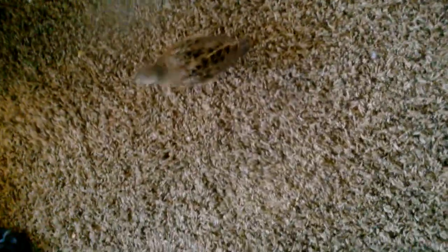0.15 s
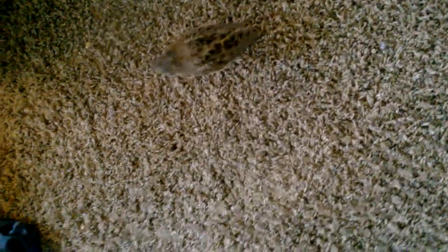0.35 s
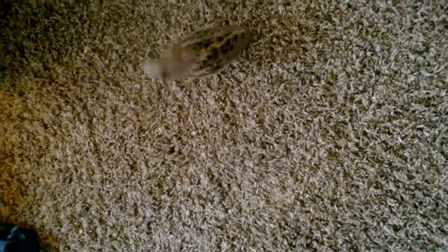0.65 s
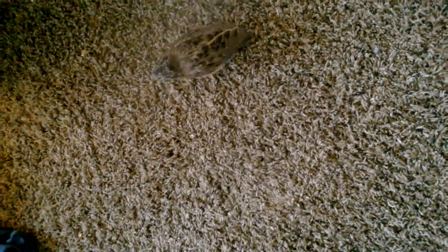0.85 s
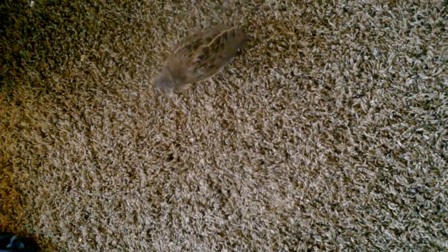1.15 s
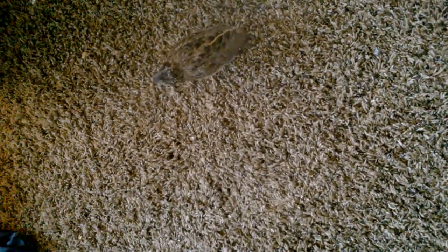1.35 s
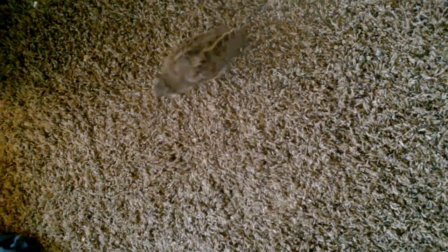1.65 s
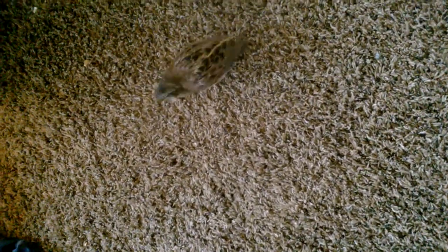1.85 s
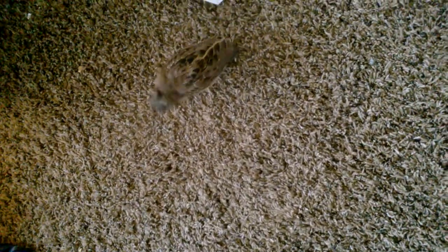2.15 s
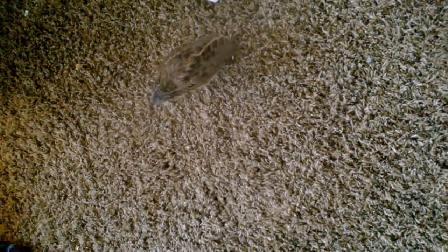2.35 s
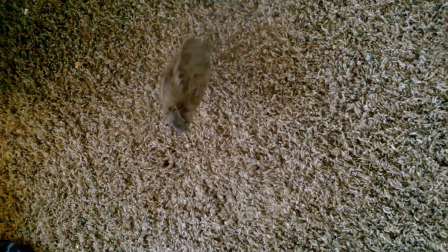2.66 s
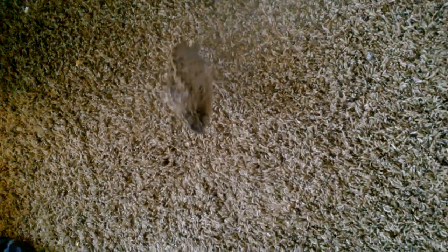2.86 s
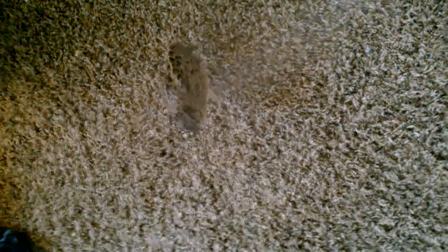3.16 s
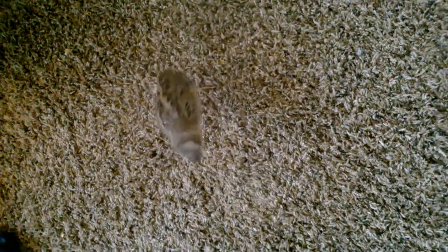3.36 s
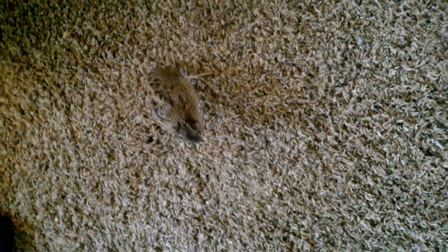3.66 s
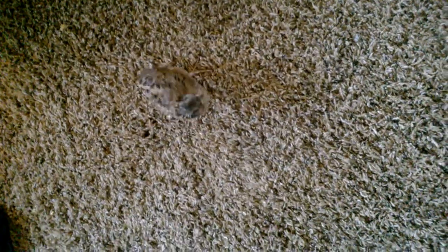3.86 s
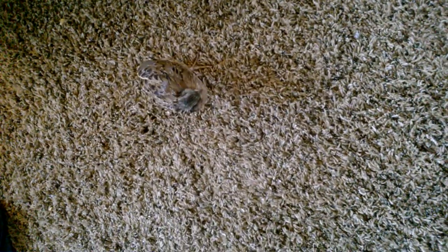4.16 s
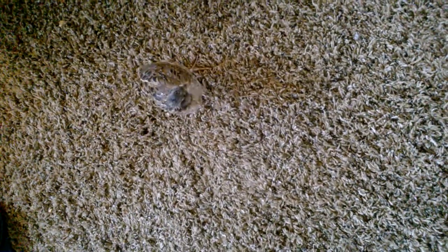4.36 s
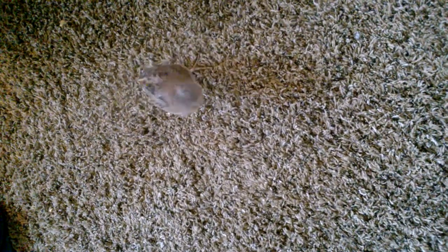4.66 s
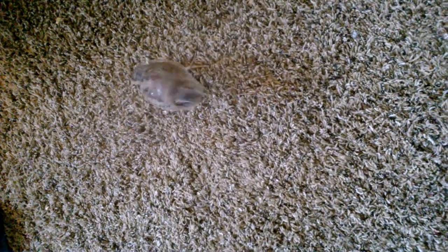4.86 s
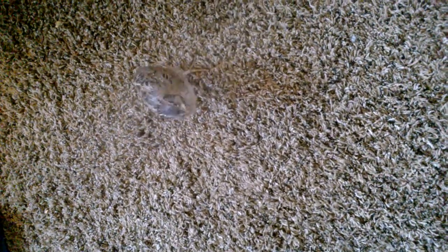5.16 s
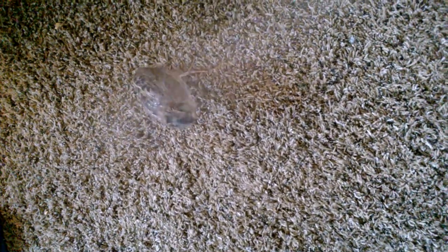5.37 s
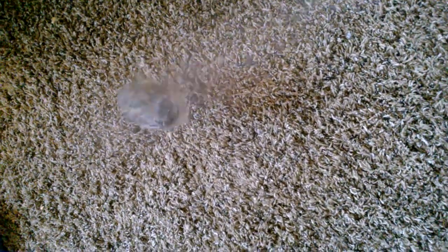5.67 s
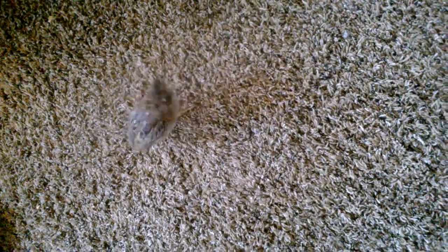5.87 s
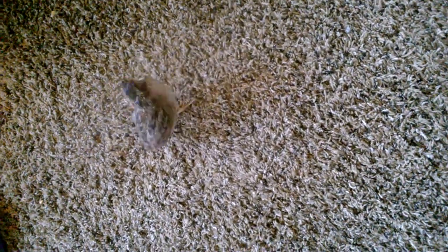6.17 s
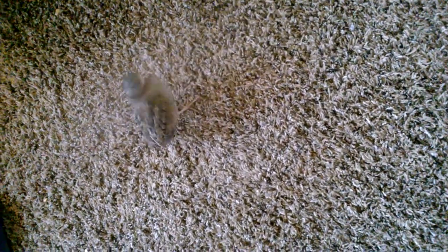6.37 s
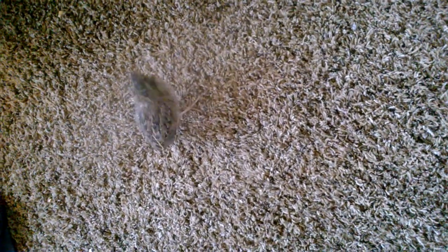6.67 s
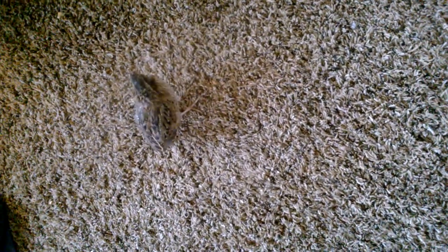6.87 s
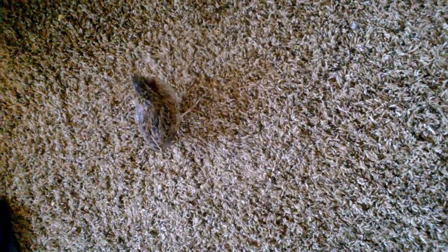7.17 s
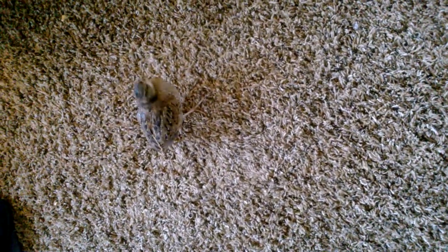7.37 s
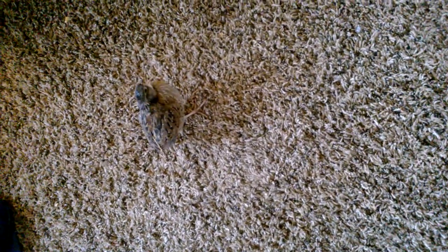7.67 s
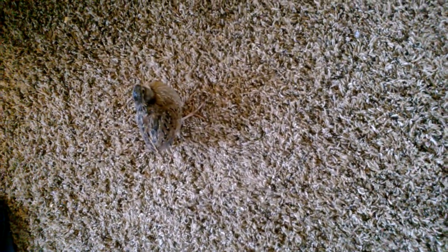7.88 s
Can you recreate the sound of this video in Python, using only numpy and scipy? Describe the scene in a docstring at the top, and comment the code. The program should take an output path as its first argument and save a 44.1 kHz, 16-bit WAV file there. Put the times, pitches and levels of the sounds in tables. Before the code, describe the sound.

Close handheld pickup of a small bird rubbing its wings and plumage on carpet indoors. Regular scratchy swishes with clicking quills and rustling feathers grow firmer, stop briefly, then return louder. The bout ends in a few sharp, fading ticks. Afterwards only low fan noise remains, with one soft rising peep and a fainter, nearly level one. Dull handling thuds occur early on, and the room adds only a short, soft echo.

```python
"""Quail dust-bathing on carpet

Two bouts of about three wing shuffles a second in a quiet room, mostly harder as they go on.
Each shuffle: a quill catches, a quickening run of ticks (noise snaps, ringing knocks), a low puff (sine glide),
a swish (shaped noise), a thin squeak (gliding partials) and a soft tap; loose plumage rustles and crackles.
A fan hums behind (noise, tones), the hand-held camera is bumped (dull noise thuds), two faint peeps come late.
"""
import sys
import numpy as np
from scipy import signal
from scipy.fft import rfft, irfft, next_fast_len
from scipy.io import wavfile
from scipy.ndimage import uniform_filter1d, map_coordinates

SR = 44100
rng = np.random.default_rng(int(sys.argv[2]) if len(sys.argv) > 2 else 0)


def master_out(mix):
    """Clip the mix to full scale and print it as 16-bit PCM to the path in sys.argv[1]."""
    frames = np.transpose(np.atleast_2d(mix))
    ceiling = np.clip(frames, -1, 1)
    pcm = np.round(ceiling * 32767).astype(np.int16)
    wavfile.write(sys.argv[1], SR, pcm)


N = 353525


def amp(db):
    """Decibels to gain."""
    return 10 ** (np.asarray(db) / 20)


def unit(x):
    """Scale to rms 1."""
    return x / np.sqrt(np.mean(x ** 2) + 1e-20)


def brief(x):
    """Scale a click to the energy of 5 ms at rms 1."""
    return x / np.linalg.norm(x) * np.sqrt(.005 * SR)


def clock(count):
    """Sample times in seconds."""
    return np.arange(count) / SR


def along(points, hz):
    """Read (hz, value) points on a log-frequency axis."""
    f, v = np.transpose(points)
    return np.interp(np.log(hz + 1), np.log(f + 1), v)


def filtered(x, response):
    """x times a response of frequency."""
    m = next_fast_len(N + SR // 4)
    return irfft(rfft(x, m) * response(np.fft.rfftfreq(m, 1 / SR)), m)[:N]


def wobble(rate_hz, count):
    """Smooth random curve, rate_hz knots a second."""
    knots = rng.standard_normal(int(count * rate_hz / SR) + 4)
    return map_coordinates(knots, [clock(count) * rate_hz])


def noise(spectrum, grain_db=0, patchy_db=0):
    """Coloured noise of rms 1; grain_db clumps it into tiny slips, patchy_db lets its colour drift."""
    slips = rng.standard_normal(N) * amp(grain_db * wobble(1500, N))
    z = signal.stft(slips, nperseg=512)[2]
    field = uniform_filter1d(rng.standard_normal(z.shape), size=9, axis=0)
    field = uniform_filter1d(field, size=9, axis=1)
    slips = signal.istft(z * amp(patchy_db * unit(field)), nperseg=512)[1][:N]
    return unit(filtered(slips, lambda hz: amp(along(spectrum, hz))))


def impulse(spectrum, size=512):
    """Causal impulse response of a spectrum, by folding its cepstrum."""
    cepstrum = irfft(np.log(amp(along(spectrum, np.fft.rfftfreq(size, 1 / SR)))))
    cepstrum[1:size // 2] *= 2
    cepstrum[size // 2 + 1:] = 0
    return irfft(np.exp(rfft(cepstrum)))


def add(track, start_s, sound):
    """Mix a sound into a track."""
    part = track[max(round(start_s * SR), 0):][:len(sound)]
    part += sound[:len(part)]


def stroke(t, start_s, end_s, rise_s, fall_s):
    """Rubbing speed: swells at the start, ebbs at the end."""
    return (1 + np.tanh((t - start_s) / rise_s)) * (1 - np.tanh((t - end_s) / fall_s)) / 4


def follow(law, excess_db):
    """Layer level when the bird works excess_db harder than usual; law = (usual_db, db_per_db)."""
    usual_db, slope = law
    return usual_db + slope * excess_db


# fan rumble spectrum: freq_hz, density_db
FAN_RUMBLE = [(20, -1), (45, -1.5), (105, -3), (135, -12.5), (280, -15), (550, -17.5), (800, -46)]
# duct noise spectrum: freq_hz, density_db
DUCT_AIR = [(400, -37), (600, -14), (680, -7.5), (800, 2.5), (930, 4), (1080, -11), (1400, -13.5),
            (2000, -17), (2800, -23), (5500, -24), (7000, -29), (16000, -30.5)]
# fan tones: freq_hz, rms_db
FAN_TONES = [(70, -78), (97, -72.5), (662, -76.5)]


def fan():
    """A distant fan: low rumble, a band of duct noise and weak wavering tones."""
    t, hum = clock(N), np.zeros(N)
    for hz, db in FAN_TONES:
        hum += amp(db) * np.sqrt(2) * np.sin(2 * np.pi * hz * t + 0.35 * wobble(9.1, N))
    rumble = amp(-67 + 2.2 * wobble(3.87, N)) * noise(FAN_RUMBLE)
    air = amp(-65.0 + 0.71 * wobble(7, N)) * noise(DUCT_AIR)
    return hum + rumble + air


# bumps of the hand on the camera: start_s, level_db
BUMPS = [(0.001, -47.5), (0.149, -49.5), (0.76, -43)]


def bumps(t60_s=0.17):
    """The camera body answers the hand with dull, short thuds."""
    t, level = clock(SR // 4), np.zeros(N)
    for start_s, db in BUMPS:
        add(level, start_s, amp(db - 60 * t / t60_s) * (1 - np.exp(-t / 0.00057)))
    body = [(30, -1), (100, -5), (270, 2.5), (480, -6.0), (1000, -9.5), (2000, -18), (5000, -60)]
    return level * noise(body)


# wing shuffles, also played by the layers below: run_start_s, catch_lead_s, first_gap_s, swish_length_s,
# tap_delay_s (from run start), pressure_db (on the pile), swish_db (drive)
SHUFFLES = [(0.169, 0.017, 0.012, 0.094, .2008, -55.5, -45.5),
            (0.481, 0.032, .012, 0.084, .2021, -60.5, -45), (0.789, 0.036, 0.017, 0.099, .205, -47, -45.5),
            (1.081, .022, .015, 0.087, 0.21, -46.5, -43.5),
            (1.3868, 0.024, 0.013, 0.092, 0.2, -48.5, -45.5), (1.682, 0.017, .014, 0.1, 0.21, -47.5, -42.5),
            (1.9864, 0.026, .0137, 0.096, 0.2, -46.5, -43), (2.2532, 0.019, 0.013, 0.1, .2096, -44.5, -41),
            (2.558, 0.026, .015, 0.09, 0.2, -43.5, -42.5), (2.8418, 0.018, 0.017, 0.088, 0.2, -41.5, -39.5),
            (3.1457, .0351, 0.018, 0.087, 0.2, -40.5, -39.5),
            (4.442, 0.014, 0.013, 0.11, 0.23, -54.5, -40.5), (4.756, .025, .0165, 0.088, .193, -41, -40.5),
            (5.049, .0249, .0172, 0.087, 0.2, -40, -37.5),
            (5.3444, .0245, .0169, 0.093, 0.21, -41.5, -38.5),
            (5.645, 0.026, .018, 0.097, .210, -38.5, -35.5),
            (5.9474, .0265, 0.018, 0.098, 0.22, -39, -36.5),
            (6.259, 0.026, 0.018, 0.097, .213, -38.5, -35.5), (6.568, 0.024, 0.019, .094, 0.21, -37, -35)]
USUAL_PRESSURE_DB, USUAL_SWISH_DB = -43, -41  # an ordinary shuffle
# spells of rustling: start_s, end_s, over_usual_db
RUSTLE_SPELLS = [(-0.1, 3.43, -.8), (4.42, 6.86, -.5), (7.865, 7.895, -21)]
# rustle spectrum: freq_hz, density_db
PLUMAGE = [(150, -29), (450, -22), (900, -9.5), (1450, 9.5), (2100, -3), (2800, -6.5), (3800, 7),
           (4800, -5.5), (6300, -18), (9000, -16), (13000, -34), (16000, -44)]
# dull snap spectrum, for barbs and quills: freq_hz, density_db
SNAP = [(300, -5), (1500, -1.5), (2700, -12.5), (3800, 7.5), (4800, 1.5), (6300, -7), (8500, -7.5),
        (16000, -29.5)]
# rustle law over swish drive: usual_db, db_per_db
RUSTLE_LAW = (-61.5, .55)


def plumage(crackle_rate_hz=45, crackle_db=-8, start_s=0.027, settle_s=0.016,
            stall_db=-7, stall_s=0.0097, rest_db=-85):
    """Loose feathers rustle in motion, hushed as a wing stalls about its catch; single barbs crackle."""
    t = clock(N)
    times_s, leads_s, *_, swish_db = np.transpose(SHUFFLES)
    moving = sum(amp(db) * stroke(t, begin_s, end_s, start_s, settle_s) for begin_s, end_s, db in RUSTLE_SPELLS)
    stalled = sum(np.exp(-np.abs(t - catch_s) / stall_s) for catch_s in times_s - leads_s)
    excess_db = np.interp(t, times_s, swish_db) - USUAL_SWISH_DB
    stir_db = follow(RUSTLE_LAW, excess_db) + stall_db * stalled

    unrest = amp(4.6 * np.tanh(wobble(45, N)))
    rustle = unrest * noise(PLUMAGE, grain_db=3.0, patchy_db=4.0)
    barbs = (rng.random(N) < crackle_rate_hz / SR) * amp(5.9 * rng.standard_normal(N))
    slips = signal.fftconvolve(barbs, amp(-60 * clock(SR // 50) / 0.01))[:N]
    crackle = amp(crackle_db) * unit(slips * noise(SNAP))
    return (moving * amp(stir_db) + amp(rest_db)) * (rustle + crackle)


# single catches of a claw or quill, setting and settling: start_s, snap_db, knock_db
STEPS = [(0.0575, -53, -34.5), (0.086, -51.5, -45.5), (3.4245, -45.5, -46.5), (4.2819, -42.5, -41.5),
         (4.4149, -48, -45), (4.437, -44.5, -42.5), (6.8505, -36.5, -43.5), (6.8952, -38, -45.5),
         (6.947, -43, -58), (7.0049, -55.5, -63), (7.06, -63.5, -71)]
# run of ticks, one row each: snap_db, knock_db (relative)
RUN_SHAPE = [(-1, 0), (0.5, 2), (1.5, 4), (-1, 3.5)]
GAP_SHRINK, TICK_SCATTER_DB = .83, 1.0  # ratio of successive gaps; random spread of tick level
# laws over pressure: (usual_db, db_per_db)
CATCH_SNAP, CATCH_KNOCK = (-44, .75), (-49, .8)
RUN_SNAP, RUN_KNOCK = (-43, 1), (-41, 0.94)
TAP_SNAP, TAP_KNOCK = (-50, 0.13), (-47.5, .03)
LANDING_DELAY_S, LANDING_KNOCK = .0095, (-50, 1)  # after the catch
SCUFF_DELAY_S, SCUFF_DB = .0065, -3.5  # after and relative to the tap


def contacts():
    """Ticks as (start_s, snap_db, knock_db): catch, landing, quickening run, tap, scuff; then steps."""
    rows, silent_db = [], -120
    for start_s, lead_s, gap_s, _, tap_s, pressure_db, _ in SHUFFLES:
        excess_db = pressure_db - USUAL_PRESSURE_DB
        catch_s, close_s = start_s - lead_s, start_s + tap_s
        tap_snap_db = follow(TAP_SNAP, excess_db)
        rows += [(catch_s, follow(CATCH_SNAP, excess_db), follow(CATCH_KNOCK, excess_db)),
                 (catch_s + LANDING_DELAY_S, silent_db, follow(LANDING_KNOCK, excess_db)),
                 (close_s, tap_snap_db, follow(TAP_KNOCK, excess_db)),
                 (close_s + SCUFF_DELAY_S, tap_snap_db + SCUFF_DB, silent_db)]
        tick_s = start_s
        run = RUN_SHAPE + TICK_SCATTER_DB * rng.standard_normal(np.shape(RUN_SHAPE))
        for k, (snap_db, knock_db) in enumerate(run):
            rows.append((tick_s, snap_db + follow(RUN_SNAP, excess_db), knock_db + follow(RUN_KNOCK, excess_db)))
            tick_s += gap_s * GAP_SHRINK ** k
    return rows + STEPS


# bright crack spectrum: freq_hz, density_db
CRACK = [(2000, -21), (6500, -19), (8200, 1.5), (9700, 1.5), (11300, -15.5), (16000, -28)]


def burst(envelope, colour):
    """Enveloped white noise through an impulse response, scaled as a click."""
    slip = envelope * rng.standard_normal(len(envelope))
    return brief(signal.fftconvolve(slip, colour)[:len(envelope)])


def ticks(knock_hz=1490, knock_t60_s=0.018, snap_t60_s=0.0034, rebound_db=-14, hard_db=-39):
    """A quill snaps free in a tiny burst, the wing knocks briefly and rebounds a few ms later."""
    t, out = clock(SR // 30), np.zeros(N)
    dull, bright = impulse(SNAP), impulse(CRACK)
    onset = 1 - np.exp(-t / 0.00024)
    for start_s, snap_db, knock_db in contacts():
        pitch, phase, lag, size = rng.standard_normal(4)
        snap = burst(onset * (amp(-60 * t / snap_t60_s) + amp(-15.5 - 60 * t / 0.036)), dull)
        crack = burst(onset * amp(-60 * t / 0.0025), bright)
        hard = 0.68 / (1 + amp(2.5 * (hard_db - snap_db)))  # harder snaps crack more
        cycles = knock_hz * np.exp(.045 * pitch) * t + phase + 0.046 * wobble(930, len(t))
        knock = amp(knock_db) * brief(np.sin(2 * np.pi * cycles) * amp(-60 * t / knock_t60_s) * onset)
        add(out, start_s, amp(snap_db) * brief((1 - hard) * snap + hard * crack) + knock)
        add(out, start_s + 0.0084 + 0.00106 * lag, amp(rebound_db + 2.9 * size) * knock)
    return out


SWISH_DELAY_S = .023  # run start to swish
# puff law over pressure: usual_db, db_per_db
PUFF_LAW = (-49, 0.76)


def puffs(start_hz=68, glide_hz_per_s=1250, width_s=.018, peak_s=.033, early_s=0.00886):
    """Each wing push shoves a low puff of air, rising in pitch as the gap closes."""
    t, out = clock(SR // 8), np.zeros(N)
    for start_s, *_, pressure_db, _ in SHUFFLES:
        phase = 2 * np.pi * (np.cumsum(start_hz + glide_hz_per_s * t) / SR + rng.random())
        puff_db = follow(PUFF_LAW, pressure_db - USUAL_PRESSURE_DB)
        swell = np.exp(-((t - peak_s) / width_s) ** 2)
        add(out, start_s + SWISH_DELAY_S - early_s, amp(puff_db) * np.sin(phase) * swell)
    return out


# hollow swish spectrum: freq_hz, density_db
SWISH = [(120, -17.5), (250, -21), (480, -9.5), (750, -8.5), (1100, -5), (1500, -3.5), (2000, -5),
         (2600, -17.5), (3400, -35), (6000, -43)]
# fibre fizz spectrum: freq_hz, density_db
FIZZ = [(1800, -46), (2900, -9), (3700, 0), (4600, 0), (5300, -8), (6200, -16), (7200, -11), (8400, -4.5),
        (9500, -9), (10400, -14.5), (11500, -16.5), (13000, -24.5), (14200, -34), (16000, -34)]
FIZZ_LAW = (-44, 0.84)  # over swish drive: usual_db, db_per_db


def swishes(lead_s=.1):
    """Feathers sweep through the pile: a hollow swish and a fizz of single fibres."""
    t, body, fibres = clock(SR // 3), np.zeros(N), np.zeros(N)
    for run_s, _, _, length_s, _, _, swish_db in SHUFFLES:
        start_s = run_s + SWISH_DELAY_S - lead_s  # room for the gradual onset
        fizz_db = follow(FIZZ_LAW, swish_db - USUAL_SWISH_DB)
        add(body, start_s, amp(swish_db + 1) * stroke(t - lead_s, .003, length_s - .002, 0.023, 0.028))
        add(fibres, start_s, amp(fizz_db) * stroke(t - lead_s, 0.0062, length_s + 0.0028, 0.025, 0.027))
    flutter = amp(0.6 * wobble(130, N))
    hollow = body * noise(SWISH, grain_db=1, patchy_db=2.0)
    fizz = fibres * noise(FIZZ, grain_db=-0.5, patchy_db=1.9)
    return flutter * (hollow + fizz)


# feather squeak partials: freq_hz, level_db (relative)
SQUEAK = [(3900, 1), (4450, -3), (5000, -6), (5600, -13), (6500, -18), (7300, -21)]
SQUEAK_LAW = (-58.5, 1)  # over swish drive: usual_db, db_per_db


def squeaks(glide_per_s=2.4, waver=0.0072, broken_db=4.0):
    """As the wing folds back, its vanes slide over each other with a thin, broken, rising whistle."""
    t, out = clock(SR // 10), np.zeros(N)
    for start_s, _, _, length_s, _, _, swish_db in SHUFFLES:
        speed = 1 + glide_per_s * np.exp(0.245 * rng.standard_normal()) * (t - .04)
        tone = np.zeros(len(t))
        for hz, db in SQUEAK:
            pitch_hz = hz * speed * (1 + 0.02 * rng.standard_normal() + waver * wobble(295, len(t)))
            level = amp(db + broken_db * wobble(94, len(t)))
            tone += level * np.sin(2 * np.pi * np.cumsum(pitch_hz) / SR)
        squeak_db = follow(SQUEAK_LAW, swish_db - USUAL_SWISH_DB)
        squeak = amp(squeak_db) * unit(tone) * stroke(t, 0.008, 0.057, rise_s=.013, fall_s=0.013)
        add(out, start_s + SWISH_DELAY_S + length_s, squeak)
    return out


# one curve a peep: time_s, pitch_hz, level_db (peak)
PEEPS = [
    [(7.478, 1355, -85), (7.487, 1660, -63), (7.498, 2240, -60), (7.512, 2560, -66), (7.53, 2830, -69),
     (7.558, 3130, -84)],
    [(7.785, 2180, -85), (7.8, 2160, -67), (7.83, 2070, -80)],
]


def peep():
    """A soft upward whistle, then a fainter, nearly level one: sines along pitch and level curves."""
    t, out = clock(N), np.zeros(N)
    for curve in PEEPS:
        time_s, pitch_hz, level_db = np.transpose(curve)
        level = amp(np.interp(t, time_s, level_db, left=-200, right=-200))
        out += level * np.sin(2 * np.pi * np.cumsum(np.interp(t, time_s, pitch_hz)) / SR)
    return out


# room decay: freq_hz, t60_s
ROOM = [(150, 0.17), (1500, 0.13), (5000, 0.23), (14000, 0.085)]


def room(x):
    """Short answer of a carpeted room: delayed noise tail, decay set per band."""
    hz, t, z = signal.stft(rng.standard_normal(SR // 3), SR, nperseg=256)
    tail = signal.istft(z * amp(-60 * t / along(ROOM, hz)[:, None]), SR, nperseg=256)[1]
    delayed = np.pad(x, (SR // 120, 0))
    return signal.fftconvolve(delayed, tail / np.linalg.norm(tail))[:N]


def scene():
    """The bird on the carpet, its room and the background."""
    bird = plumage() + ticks() + puffs() + swishes() + squeaks()
    call = peep()
    echo = room(amp(-16.5) * bird + amp(-6) * call)
    return (fan() + bumps() + bird + call + echo)[None]


TOP_HZ = 15950


def record(dry):
    """The camera keeps nothing above its band limit."""
    return filtered(dry[0], lambda hz: hz < TOP_HZ)[None]


dry = scene()
out = record(dry)
master_out(out)
```